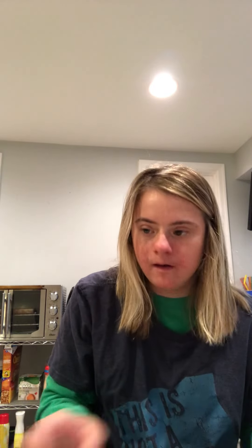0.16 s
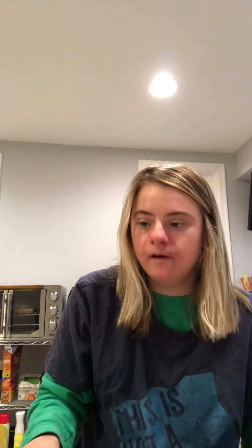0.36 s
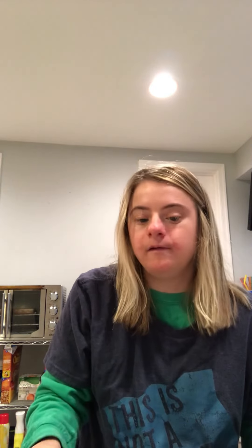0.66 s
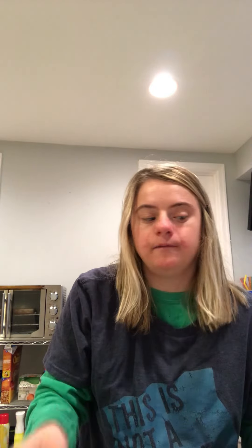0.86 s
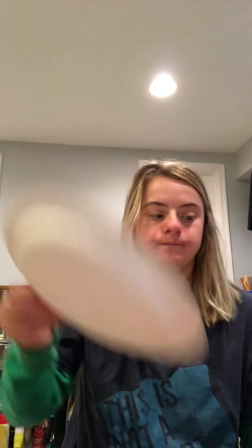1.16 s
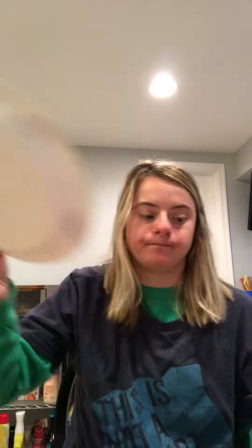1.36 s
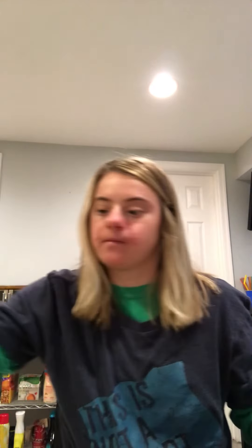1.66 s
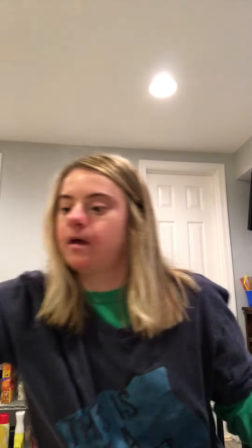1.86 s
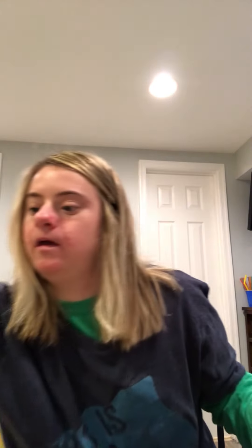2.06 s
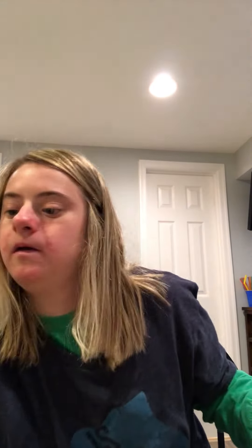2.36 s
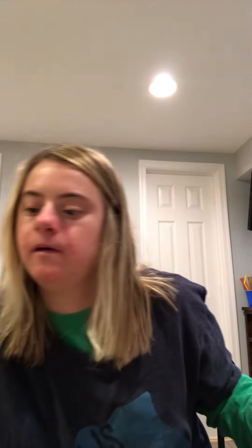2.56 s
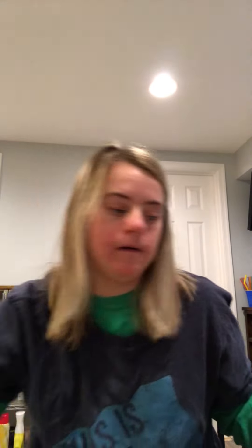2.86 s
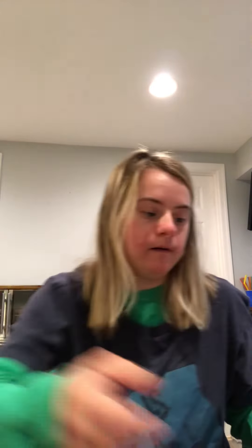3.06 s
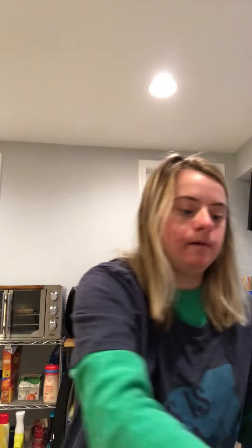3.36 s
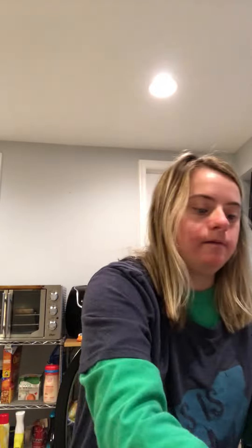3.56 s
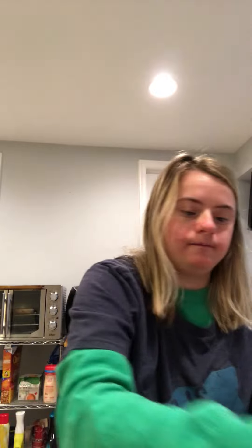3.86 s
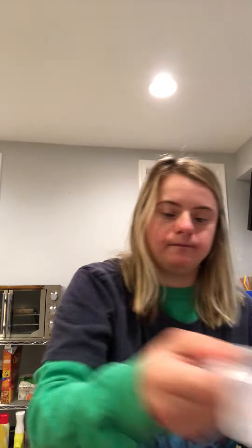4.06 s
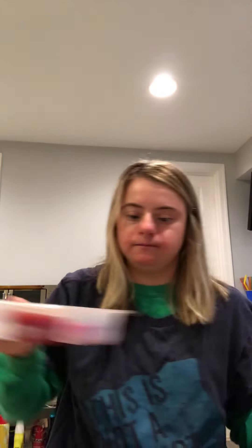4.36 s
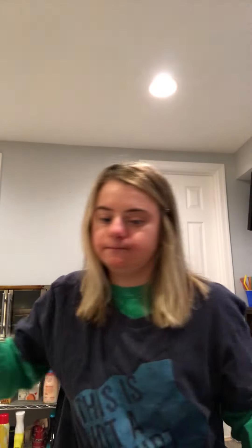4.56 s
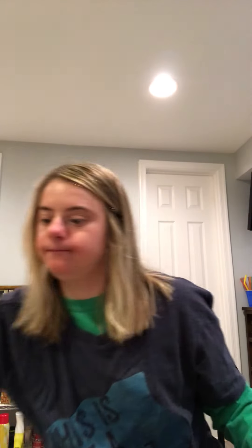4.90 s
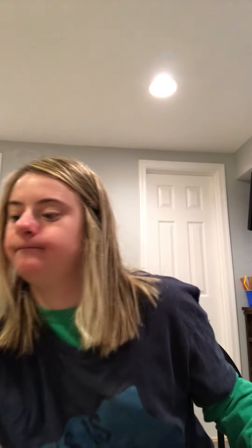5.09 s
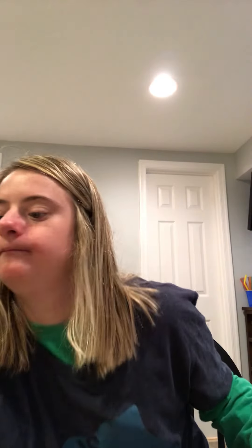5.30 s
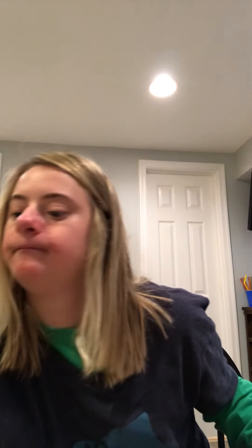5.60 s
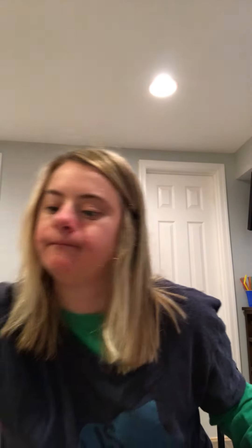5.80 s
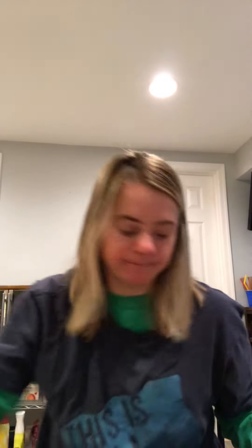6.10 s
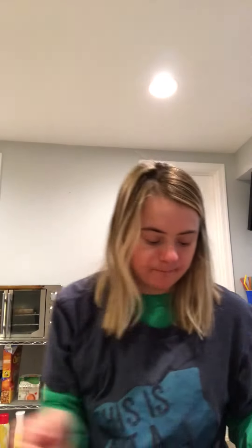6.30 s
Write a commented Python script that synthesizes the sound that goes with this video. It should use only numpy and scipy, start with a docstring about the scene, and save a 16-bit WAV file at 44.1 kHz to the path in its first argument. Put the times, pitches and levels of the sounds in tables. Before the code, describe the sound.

Dishes and a plastic tub are moved and set down on a wooden table, with irregular thumps, clicks and light scrapes.

```python
"""Dishes and a plastic tub are moved about a wooden table in a hard-walled, ringing kitchen.
Over appliance rumble and hiss, a set-down at 0.3 s thumps the board, clicks the ware and rocks the table.
Light ticks and grains of paper and plastic rustle lead to a second set-down at 2.5 s, then a clatter
around 3.8 s and softer taps. At 5.4 s a dragged rim squeaks faintly; the heaviest set-down lands
just after, at 5.7 s, and two small knocks close the scene."""
import sys
import numpy as np
from scipy import signal
from scipy.fft import rfft, irfft
from scipy.io import wavfile
from scipy.ndimage import uniform_filter1d

SR = 44100
rng = np.random.default_rng(int(sys.argv[2]) if len(sys.argv) > 2 else 0)


def wav_record(signal):
    """Record a signal, one row per channel, as 16-bit PCM in the file named by sys.argv[1]."""
    frames = np.transpose(np.atleast_2d(signal))
    bounded = np.clip(frames, -1, 1)
    # unit amplitude maps onto the largest positive 16-bit level
    quanta = np.round(bounded * 32767).astype(np.int16)
    wavfile.write(sys.argv[1], SR, quanta)


N = 284004


def undb(db):
    """Decibels to gain."""
    return 10 ** (np.asarray(db) / 20)


def unit(x):
    """Scale to rms 1."""
    return x / np.sqrt(np.mean(x ** 2))


def band(x, lo_hz, hi_hz):
    """Butterworth band-pass."""
    return signal.sosfilt(signal.butter(2, [lo_hz, min(hi_hz, .45 * SR)], "band", fs=SR, output="sos"), x)


def drift(rate_hz):
    """Random modulator: sample-and-hold, smoothed twice."""
    hold = int(SR / rate_hz)
    steps = np.repeat(rng.standard_normal(N // hold + 1), hold)
    return uniform_filter1d(uniform_filter1d(steps, hold), hold)[:N]


def ring(hz, db, t60, phase, t):
    """Sum of decaying modes, scaled to peak 1."""
    partials = undb(db)[:, None] * np.sin(2 * np.pi * hz[:, None] * t + phase[:, None])
    y = (partials * 1000 ** (-t / t60[:, None])).sum(axis=0)
    return y / np.abs(y).max()


def stroke(start, length, attack_s=0.0088, release_s=0.029):
    """Envelope of one stroke: attack, hold, release."""
    t = np.arange(N) / SR - start
    return np.clip(t / attack_s, 0, 1) ** 2 * np.exp(-np.maximum(t - length, 0) / release_s)


def add(out, start, y):
    """Mix y into out from start, in seconds."""
    i = int(start * SR)
    out[i:i + len(y)] += y[:N - i]


# EQ curve of the room tone: (frequency [Hz], relative level [dB])
ROOM_TONE_EQ = [(15, -76), (25, -41), (47, -12), (70, 0.5), (94, -12), (126, -7.5), (235, -10),
                (334, -15.5), (372, -16.5), (528, -25), (692, -22.5), (814, -30.5), (2270, -34),
                (9500, -41), (15900, -46)]

def room_tone(level_db=-61):
    """A bed of appliance rumble and microphone hiss; the bass wavers slowly."""
    bins_hz = np.maximum(np.arange(N // 2 + 1) * SR / N, 1)
    hz, db = np.transpose(ROOM_TONE_EQ)
    eq = undb(np.interp(np.log(bins_hz), np.log(hz), db))
    steady = irfft(rfft(rng.standard_normal(N)) * eq, N)
    waver = (undb(2.5 * drift(2.6)) - 1) * band(steady, 22, 280)
    return undb(level_db) * unit(steady + waver)


# Octave bands of the kitchen's tail: (centre [Hz], t60 [s], level [dB])
REVERB_BANDS = [(128, 0.2, -18), (263, 0.49, -16.5), (458, 0.2, -13), (1024, 0.5, -22.5),
                (1840, 0.53, -16.5), (4120, 0.51, -13), (7700, 0.4, -8.5), (11600, 0.39, -15.5)]

def kitchen_reverb(x, predelay_s=0.006):
    """Hard walls return a diffuse tail, each band fading at its own rate."""
    t = np.arange(SR) / SR
    onset = np.clip((t - predelay_s) / 0.0015, 0, 1)
    tail = 0
    for hz, t60, db in REVERB_BANDS:
        noise = band(rng.standard_normal(SR), hz / np.sqrt(2), hz * np.sqrt(2))
        decay = 1000 ** (-t / t60)
        energy = np.sum(decay ** 2) * hz / (SR / 2)
        tail = tail + undb(db) * noise * decay * onset / np.sqrt(energy)
    return signal.fftconvolve(x, tail)[:N]


def rim_squeak(start_s=5.41, length_s=0.13, level_db=-76, pitch_hz=4950, sag_hz_per_s=1200):
    """The dragged rim gives a rough squeak that sinks as the drag slows."""
    hz = pitch_hz - sag_hz_per_s * np.clip(np.arange(N) / SR - start_s, 0, length_s)
    tone = np.sin(2 * np.pi * np.cumsum(hz * (1 + 0.035 * drift(600))) / SR)
    return stroke(start_s, length_s) * undb(level_db + 7 * drift(70)) * tone


# Resonances of the thin walls: (centre [Hz], half-width [Hz], relative level [dB])
WALL_BANDS = [(1710, 17, -7), (2036, 360, 4.5), (2676, 68, -6), (3045, 390, -7), (3510, 480, 3),
              (4520, 670, -1.5), (4920, 230, -15.5), (5720, 87, -38)]
# Rub and rustle cues: (time [s], length [s], mid level [dB], treble vs mids [dB], lows vs mids [dB])
RUB_CUES = [(0.282, 0.053, -61.5, -14, 12.5), (0.414, 0.096, -60.5, -12, -3.5),
            (0.807, 0.096, -67.5, -11, -11), (0.959, 0.06, -64.5, -10, -7.5),
            (2.115, 0.069, -76, -14, -2.5), (2.397, 0.035, -69, -8, -18), (3.507, 0.11, -65, -14, 2.5),
            (3.635, 0.18, -68, -11, 3), (3.752, 0.06, -67, -14, 9), (3.885, 0.039, -67.5, -13, 7.5),
            (4.414, 0.21, -77, -12, -13), (4.6, .16, -78.5, -14, -13), (5.374, 0.047, -62.5, -32, 0),
            (5.425, 0.26, -68, -13, 0.5), (5.63, 0.021, -61, -11, 6.5), (5.65, 0.041, -47, -8.5, -1.5),
            (5.725, 0.015, -51, -17, -22), (5.761, 0.014, -55.5, -11, 10)]

def rubbing(spikes_per_s=1500):
    """Dense uneven micro-slips excite the thin walls of plate and tub while they drag."""
    noise = rng.standard_normal(N)
    spikes = (rng.random(N) < spikes_per_s / SR) * undb(9 + 3 * rng.standard_normal(N))
    slips = noise * (1 + spikes) * undb(3.5 * drift(120))
    walls = sum(undb(db) * unit(band(slips, hz - half, hz + half)) for hz, half, db in WALL_BANDS)
    mids = unit(unit(walls) + 0.91 * unit(band(slips, 2540, 8380)))
    treble = unit(band(slips, 6000, 15000))
    lows = unit(band(slips, 557, 1770))
    return sum(stroke(start, length) * undb(db) * (mids + undb(treble_db) * treble + undb(low_db) * lows)
               for start, length, db, treble_db, low_db in RUB_CUES)


# Swells of the rocking table: (time of widest swing [s], level [dB], rise [s])
ROCK_CUES = [(.336, -47, 0.023), (.51, -54.5, 0.027), (2.57, -45, 0.011), (3.558, -59, 0.023),
             (3.7, -51.5, 0.016), (3.76, -53, .02), (3.879, -51, 0.026), (4.292, -59.5, .03),
             (4.54, -56, 0.022), (4.628, -54.5, 0.016), (4.71, -59, 0.026), (5.49, -54, 0.03),
             (5.689, -24, 0.014), (5.811, -43, 0.021)]

def table_rocking(pitch_hz=76.7):
    """Struck or leant on, the table rocks on its legs with a low, wobbling tone."""
    swing, t = np.zeros(N), np.arange(SR // 2) / SR
    tone = np.sqrt(2) * np.sin(2 * np.pi * np.cumsum(pitch_hz * (1 + 0.1038 * drift(19))) / SR)
    for widest, db, rise in ROCK_CUES:
        add(swing, widest - rise, undb(db) * t / rise * np.exp(1 - t / rise))
    return swing * tone


# Ringing modes of the ware: (frequency [Hz], relative level [dB])
WARE_MODES = [(790, 3.5), (1030, 0), (1260, -13), (1410, 1.5), (1620, -0.5), (1960, 4.5), (2200, 4),
              (2660, -1.5), (3080, 4), (3540, -0.5), (4040, 3.5), (4340, 1), (4840, 3.5), (5200, 1.5),
              (5870, 7)]
# Noise bands of the contact crack: (low edge [Hz], high edge [Hz])
CRACK_BANDS = [(800, 1500), (1500, 3300), (3300, 6500), (6500, 15000)]
# Ware hitting wood or other ware:
# (time [s], level [dB], focus [Hz], roll-off below [dB/octave], roll-off above [dB/octave])
CLICK_CUES = [(.043, -50, 1170, 3, 13.5), (.2906, -30, 1520, -2, 4.7), (.4085, -44, 2060, -7.5, 2.7),
              (.4775, -47, 1940, 5, 1), (.419, -49, 4500, 4, 1.5), (0.6014, -55.5, 2030, 16, 6.5),
              (.61, -50, 3080, 7, 8.4), (.8165, -40, 2950, 13, 6.8), (.8437, -48, 2230, 31, 11),
              (.8964, -62, 2900, 12, 9), (1.807, -58, 7550, 2.5, 5), (1.943, -52.5, 9500, 25, 8),
              (2.186, -54, 2370, 2, 3.6), (2.205, -55, 2280, 18, 12), (2.4175, -54, 5240, 7, 7.1),
              (2.428, -56.5, 4970, 5, 10), (2.5407, -25, 3760, 2.5, 10), (2.5615, -31.5, 1950, -5, 3.4),
              (3.5126, -44.5, 1690, -1.5, 4), (3.5582, -47, 1320, 12, 9.1), (3.6037, -32, 1410, -5, 4.5),
              (3.7546, -40, 1100, 6, 7.6), (3.7638, -46, 1590, -7, 8.7), (3.785, -43, 1200, 3, 8.2),
              (3.8015, -36, 2080, -5.5, 3.5), (3.8125, -28.5, 1160, 2, 2.6), (3.829, -23.5, 1110, -5, 8.8),
              (3.8475, -28, 1190, 4, 5.1), (3.8687, -38, 1500, 9, 3.6), (3.887, -37, 3970, -1.5, 2),
              (3.9022, -52, 1850, 7, 4.5), (4.185, -54, 1680, 13, 7.8), (4.32, -51, 1140, 11, 18),
              (4.422, -55, 1680, 12, 10), (4.4486, -53.5, 1750, 6, 5), (4.6005, -43.5, 1200, 11, 7),
              (4.623, -44.5, 1720, 22, 7.4), (4.65, -53.5, 1490, 15, 6), (4.6862, -54, 1570, 7, 6),
              (4.7087, -54.5, 1570, 11, 8), (5.1838, -53.5, 2090, 9, 3.4), (5.3903, -52, 7500, 0.5, 3),
              (5.656, -28, 4330, 0, 11), (5.6639, -21, 4440, 1.5, 8), (5.698, -28.5, 1750, 9, 4.5),
              (5.7345, -24, 2720, 9, 8.4), (5.7734, -29, 1320, 0.5, 6), (5.783, -30.5, 1260, 21, 4.5)]

def ware_clicks(t60_at_2khz_s=0.03):
    """Each contact is a crack of noise and a short ring of the ware's modes, dying faster in the treble."""
    out, t = np.zeros(N), np.arange(SR // 6) / SR
    hz, mode_db = np.transpose(WARE_MODES)
    t60 = t60_at_2khz_s * (2000 / hz) ** 0.36
    snap = (1 - np.exp(-t / 0.0008)) * (0.78 + np.exp(-t / 0.0014))
    for start, db, focus_hz, below, above in CLICK_CUES:
        def colour_db(f):
            return db - np.where(f < focus_hz, below, above) * np.abs(np.log2(f / focus_hz))

        scatter, detune, phase = rng.standard_normal((3, len(hz)))
        lift_db = 6 * np.exp(-(np.log2(hz / focus_hz) / 0.11) ** 2)  # the spot struck favours one mode
        hit_db = mode_db + colour_db(hz) + 1.5 * scatter + lift_db
        click = undb(hit_db.max() - 6) * ring(hz * (1 + 0.021 * detune), hit_db, t60, 3 * phase, t)
        noise = rng.standard_normal(len(t))
        for lo, hi in CRACK_BANDS:
            crack = unit(band(band(noise, lo, hi), lo, hi))
            crack_t60 = 2.28 * t60_at_2khz_s * (1500 / lo) ** 0.097
            click += undb(colour_db(np.sqrt(lo * hi)) - 12.5) * crack * 1000 ** (-t / crack_t60)
        add(out, start, click * snap)
    return out


# Modes of the wooden board: (frequency [Hz], relative level [dB], free t60 [s])
BOARD_MODES = [(157, -31, 0.076), (184.6, -1, 0.33), (217.4, -0.5, 0.4), (237.4, 6, 0.14),
               (289.3, 6.5, 0.29), (367.6, -2.5, 0.68), (396.7, 5, 0.5), (451, -6.5, 0.45),
               (483.7, 4, 0.31), (526, 6, 0.12), (560, -22, 0.042), (680, -1, 0.11), (800, -2, 0.071)]
# Blows into the table top: (time [s], level [dB], focus [Hz], tilt [dB/octave], damping [1 = free])
THUD_CUES = [(0.29, -19.5, 234, 4.5, 3.24), (0.407, -27.5, 490, -3, 6.8), (0.604, -46, 186, -9, 4.1),
             (0.981, -49, 221, -1.5, 2.8), (1.213, -42, 240, 5, 2.1), (1.564, -52.5, 390, -4, 3.2),
             (2.54, -24, 415, -1.5, 5.5), (2.56, -25.5, 203, -2, 4.2), (3.53, -36.5, 208, 0.5, 6),
             (3.606, -42.5, 597, -10, 5.7), (3.664, -44, 193, -4.5, 4.3), (3.722, -46.5, 172, -5, 2),
             (3.812, -35, 404, 7, 2.6), (3.827, -40.5, 690, -3, 2.8), (3.924, -47, 305, -7, 2.6),
             (4.508, -41, 178, -13, 3.2), (4.566, -44, 196, -8, 2.5), (4.599, -49, 172, -3, 3.5),
             (4.707, -49.5, 310, 3, 3.6), (5.633, -31, 637, 7, 3), (5.659, -13, 210, 0, 6.6),
             (5.678, -42, 215, -1.5, 2.9), (5.776, -32, 264, -6.5, 3.8), (6.22, -51, 230, -4, 3.2),
             (6.33, -52.5, 183, -1, 3.6)]

def table_thuds(lag_s=0.00099, attack_s=0.0036, punch_s=0.02, lift_db=8, reach_octaves=0.33):
    """Each blow rings the board, damped by hand and ware: a hard punch, then a softer tail."""
    out, t = np.zeros(N), np.arange(SR // 2) / SR
    hz, mode_db, t60 = np.transpose(BOARD_MODES)
    punch = (1 - np.exp(-(t / attack_s) ** 2)) * (0.44 + 2.69 * np.exp(-t / punch_s))
    for start, db, focus_hz, tilt, damping in THUD_CUES:
        scatter, detune = rng.standard_normal((2, len(hz)))
        octaves = np.log2(hz / focus_hz)
        favour = np.exp(-(octaves / reach_octaves) ** 2)  # the spot struck lifts modes near the focus
        hit_db = mode_db + tilt * octaves + lift_db * favour + 2.2 * scatter
        knock = ring(hz * (1 + 0.034 * detune), hit_db, t60 / damping, np.zeros_like(hz), t)
        add(out, start + lag_s, undb(db) * knock * punch)  # the board answers just after the contact
    return out


def scene():
    """Mono mix of the close handling sounds, their reverb and the room tone."""
    close = table_thuds() + table_rocking() + ware_clicks() + rubbing() + rim_squeak()
    return (close + kitchen_reverb(close) + room_tone())[None, :]


def record(dry):
    """The phone rolls off the bass below 35 Hz and cuts the top steeply at 15750 Hz."""
    low_cut = signal.butter(2, 35, "high", fs=SR, output="sos")
    high_cut = signal.ellip(10, .2, 80, 15750, fs=SR, output="sos")
    return signal.sosfilt(high_cut, signal.sosfilt(low_cut, dry))


dry = scene()
out = record(dry)
wav_record(out)
```